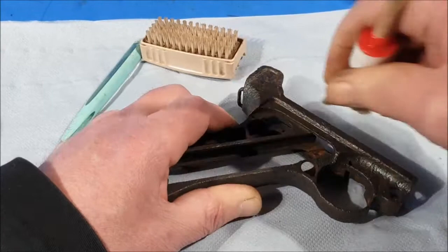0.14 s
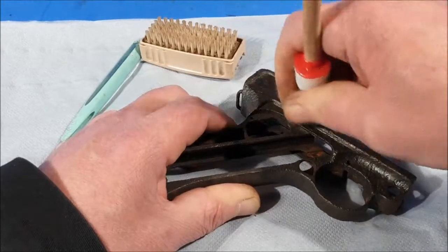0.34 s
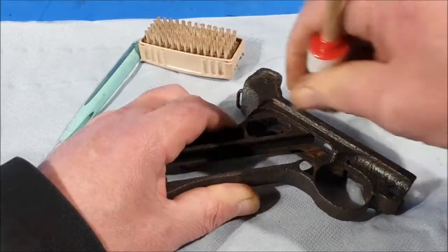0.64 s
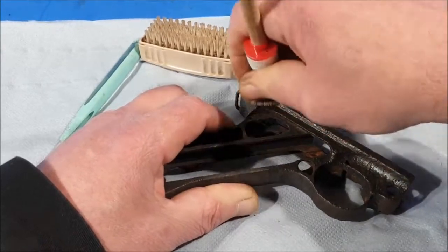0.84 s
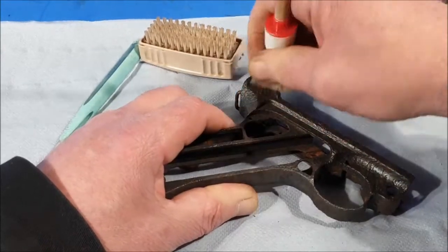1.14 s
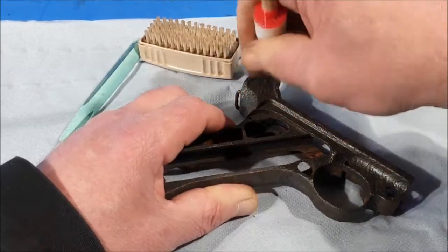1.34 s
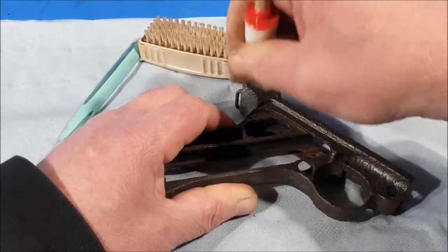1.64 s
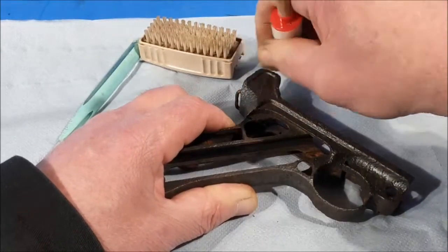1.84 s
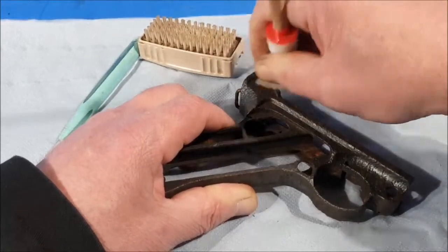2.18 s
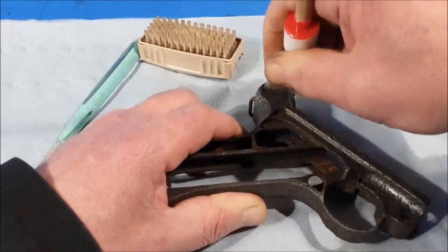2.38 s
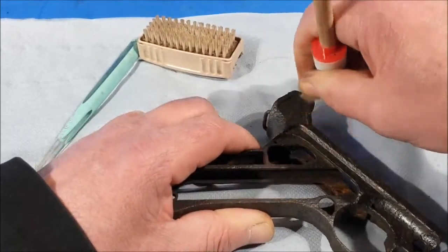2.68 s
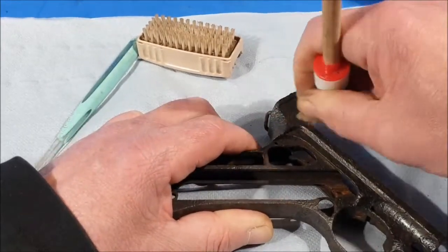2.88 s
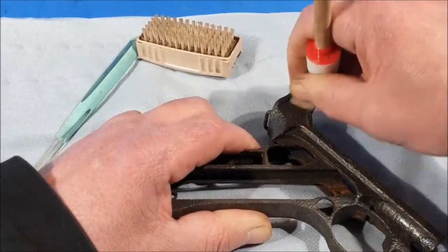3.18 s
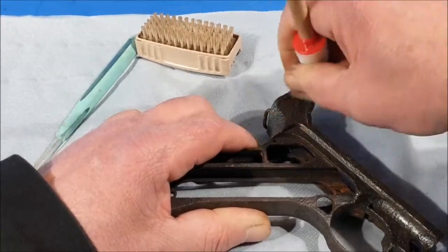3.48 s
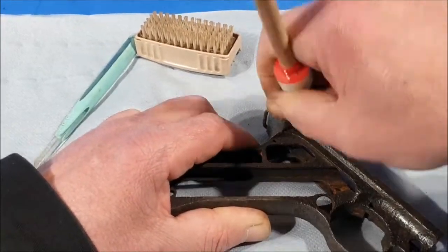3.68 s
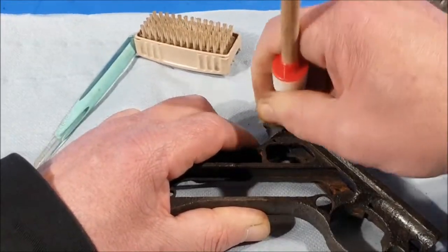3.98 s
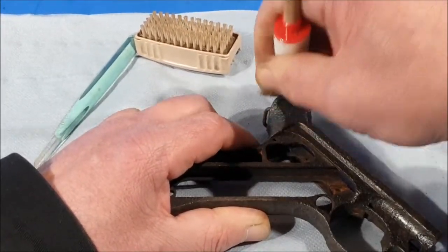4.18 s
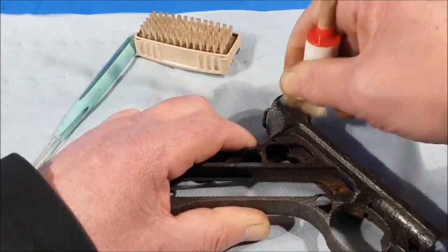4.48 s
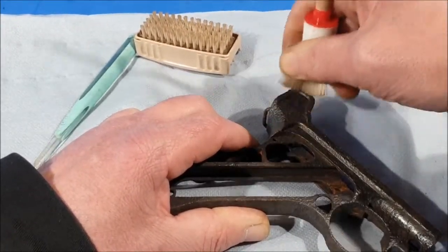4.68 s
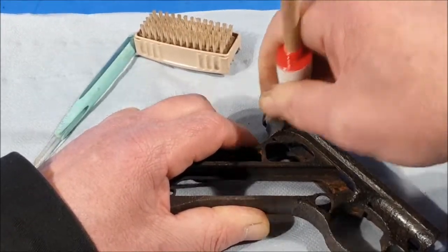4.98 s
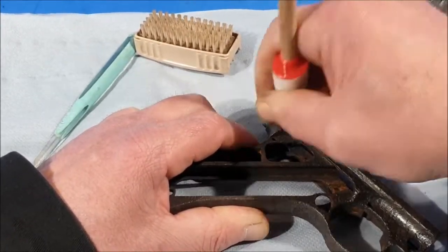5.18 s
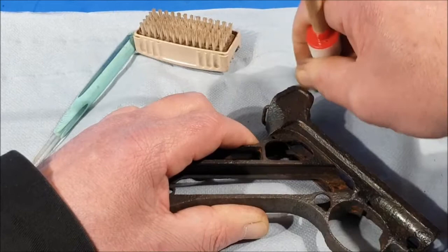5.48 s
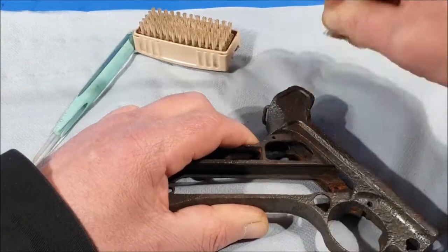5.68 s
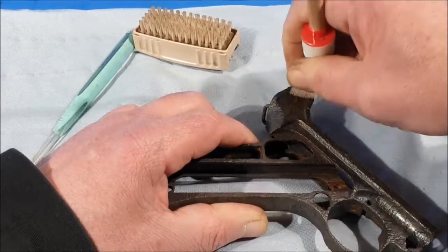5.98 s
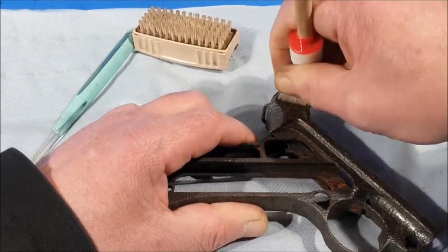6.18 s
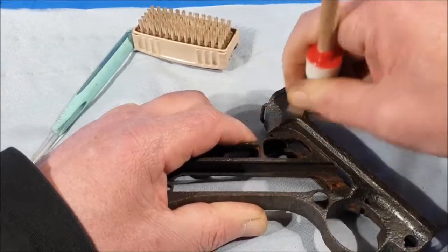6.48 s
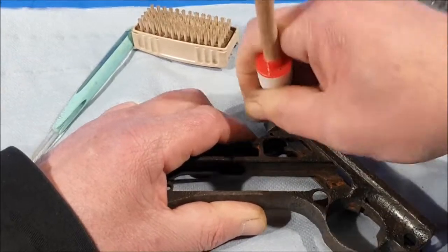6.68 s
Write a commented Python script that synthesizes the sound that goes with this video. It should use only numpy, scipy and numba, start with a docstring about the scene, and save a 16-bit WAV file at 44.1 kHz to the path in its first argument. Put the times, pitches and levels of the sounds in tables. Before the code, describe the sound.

A near, dry stereo pickup in a small quiet room with soft low air noise. From 0 to 0.8 s there are a cut-off scratch, light ticks and a couple of soft brushing sweeps, then a gap with a dull tap. From about 0.9 s bristles rasp over steel in separate strokes, roughly four a second, each a quick swelling bright hiss with gritty undertone, a small tick and a muffled bench thud. Thin metallic rings flicker briefly. Around 2.3 to 2.9 s the strokes soften, with fainter rustling and a barely audible airy tone. Firm regular strokes return from 2.9 to 4.8 s, with rounder thuds. From 4.9 s the scrubbing becomes quicker and denser. Two hard clicks stand out at 5.63 s, followed by a brief lull; rapid scratching resumes at 5.9 s, with a heavier knock and click near 6.7 s, still scrubbing at the end.

```python
"""A cloth-covered workbench in a small quiet room: a stiff hand brush scrubs a rusty steel part.
The bristles hiss and grind as clouds of tiny random slips; soft thuds set the modes of the bench going.
Ticks are short noise bursts; they, the slips and sharp plucks make the steel ring at a few high modes.
A faint airy note comes and goes, and delay lines add a short room tail for the two-port microphone."""
import sys
import numpy as np
from scipy import signal
from scipy.fft import rfft, irfft, next_fast_len
from scipy.io import wavfile
from scipy.ndimage import uniform_filter1d
from numba import njit

SR = 44100
rng = np.random.default_rng(int(sys.argv[2]) if len(sys.argv) > 2 else 0)


def magnitude_from_level(level_db):
    """Linear magnitude for a level in decibels (20 dB per decade)."""
    exponent = np.asarray(level_db, float) / 20
    return 10 ** exponent


def wrap_up_sound(samples):
    """Save the sound to the file named by the first command line argument, as 16-bit audio."""
    columns = np.atleast_2d(samples).T
    # keep every value between -1 and 1, then stretch to whole-number steps
    tamed = np.clip(columns, -1, 1)
    steps = np.round(tamed * 32767).astype(np.int16)
    wavfile.write(sys.argv[1], SR, steps)


N = 301203  # length in samples

# The brush head lands or turns and jolts the bench:
# (time [s], relative strength [dB], contact [ms], lasting modes [dB], their tilt [dB per octave])
BENCH_BLOWS = [(0.0, -48, 1.2, -0.5, -0.5), (0.307, -43.5, 1.9, 0, -1), (0.774, -33, 1.01, -1.5, 1.3),
               (1.15, -31.5, 1.03, -.6, 3), (1.406, -31, 1.2, 0.1, 2), (1.703, -26, 0.97, 1, -0.5),
               (1.937, -35, 1.96, -0.5, 3.5), (2.173, -28.5, 1.1, 0.5, 2.5), (2.492, -45.5, 1.65, 0, -1.5),
               (2.866, -37, 2.14, -2.5, .1), (3.156, -29, 1.7, 1, -0.5), (3.434, -25.5, 1.4, -1, 0.2),
               (3.709, -26, 0.92, 1.3, -2.5), (3.989, -32, 2, -1.3, 0.8), (4.239, -25.5, 1.4, -0.3, -2),
               (4.492, -32.5, 1.5, -2.1, -1.5), (4.749, -28, 1.3, -5, 0.5), (4.925, -45, 1.93, 1.8, 0.5),
               (5.131, -36.5, 1.17, 1, -1.5), (5.328, -43.5, 1.5, 2.5, -1.7), (5.403, -45, 1.4, -9, 6),
               (5.513, -36.5, 2.3, 2.5, -2.8), (5.635, -35.5, 1.44, -1.3, 0), (5.89, -32, 1.4, 0.8, -1.1),
               (6.007, -38.5, 0.58, 3, -0.7), (6.089, -45, 2.1, 0, 2.5), (6.302, -47, 1, -1, 1),
               (6.384, -37, 2.1, 0.5, -1), (6.685, -23.5, 2.06, -2.5, 0.3)]
# Modes of the steel part: (frequency [Hz], time to fall by 60 dB [s], left gain [dB], right gain [dB])
STEEL_MODES = [(4815, 0.08, -6, -13.5), (5960, 0.064, -34, -20), (7642, 0.0457, 2, -27),
               (8430, 0.054, -10, -21), (9830, 0.058, -27, -23), (10600, 0.039, -20, -26),
               (11240, .04, -44, -30), (13900, .06, -35, -33), (13700, .05, -17, -22)]
LOW_RING_HZ = 6500  # steel modes below this count as low, the others as high


def level(x, db):
    """Scale to an rms level."""
    return x * magnitude_from_level(db) / np.sqrt(np.mean(x ** 2))


def colour(x, table, column):
    """Shape the spectrum by one dB column of a table, joined on a log-frequency axis."""
    table = np.array(table, float)
    size = next_fast_len(N)
    hz = np.maximum(np.arange(size // 2 + 1) * SR / size, 1)
    # frequencies outside the table are turned down by 70 dB
    db = np.interp(np.log(hz), np.log(table[:, 0]), table[:, column], -70, -70)
    return irfft(rfft(x, size) * magnitude_from_level(db), size)[..., :N]


def ring(x, hz, t60):
    """One decaying mode, t60 in s; steady white noise of rms 1 makes it ring near rms 1."""
    pole = np.exp(2j * np.pi * hz / SR - np.log(1000) / (t60 * SR))
    gain = np.sqrt(2 * (1 - abs(pole) ** 2))
    return signal.lfilter([gain], [1, -pole], x).imag


def walk(rate):
    """Slow random wander: a new random value every 1 / rate s, joined by ramps."""
    k = int(SR / rate)
    held = np.repeat(rng.standard_normal(N // k + 1), k)
    return uniform_filter1d(held, k)[:N]


def slips(per_s, spread_db):
    """Bristles catching and letting go: scattered clicks of uneven size, rms 1."""
    size = magnitude_from_level(spread_db * rng.exponential(size=N)) * rng.standard_normal(N)
    return level(size * (rng.random(N) < per_s / SR), 0)


def quiet():
    """Still air of the room: alike at both ports in the bass, unrelated above."""
    # spectrum of the air noise: (frequency [Hz], relative level [dB])
    air_tone = [(18, -21), (40, 10.5), (60, 9), (95, 3), (140, -1.5), (300, -10), (650, -13), (870, -10.5),
                (1130, -23.5), (1500, -27), (1900, -28), (2250, -27.5), (2800, -29.5), (7000, -34.5),
                (9000, -41), (16500, -24)]
    # balance of the ports: (frequency [Hz], left minus right [dB])
    air_pan = [(60, 0.5), (500, 10), (1500, 10.5), (7000, 19), (10000, 21), (15000, 13)]
    mid, left, right = rng.standard_normal((3, N))
    bass_filter = signal.butter(2, 350., fs=SR, output="sos")
    # in the bass this swaps each port's own noise for the shared one
    bass = signal.sosfilt(bass_filter, [mid - left, mid - right])
    air = level(colour(np.array([left, right]) + bass, air_tone, 1), -61)
    half = [(hz, db / 2, -db / 2) for hz, db in [(0.94, 0)] + air_pan + [(SR / 2, 0)]]
    drift = magnitude_from_level(1.6 * walk(3))
    return np.array([colour(air[k], half, 1 + k) for k in range(2)]) * drift


@njit
def walls(x, lags, gain, damp):
    """Room tail: eight delay lines (lags in samples) that feed each other, duller on every round."""
    line, soft, out = np.zeros((8, 4096)), np.zeros(8), np.zeros((2, x.shape[1]))
    for i in range(x.shape[1]):
        total = 0.
        for k in range(8):
            soft[k] += (1 - damp) * (gain[k] * line[k, (i - lags[k]) & 4095] - soft[k])
            total += soft[k]
            out[k % 2, i] += soft[k]
        for k in range(8):
            line[k, i & 4095] = x[k % 2, i] + soft[k] - total / 4
    return out


def airy():
    """A faint airy note: noise that wavers in level and rings one narrow mode."""
    # when the note sounds: (start [s], length [s], relative level [dB])
    note_spans = [(0.197, .25, -77), (2.449, 1.38, -77.5), (5.642, .4, -69)]
    edge_s = 0.071  # fade at both ends
    port_db = np.array([5, -31])  # left, right
    t = np.arange(N) / SR
    gain = np.zeros(N)
    for s, length, db in note_spans:
        gain += magnitude_from_level(db) * np.clip(np.minimum(t - s, s + length - t) / edge_s, 0, 1)
    waver = magnitude_from_level(1.5 * walk(48))
    note = ring(gain * waver * rng.standard_normal(N), hz=2269, t60=0.04)
    return magnitude_from_level(port_db)[:, None] * note


def bench(push):
    """A soft blow slaps the bench top; the slap drives its longer modes; dragging keeps them rumbling."""
    # modes of the bench top: (frequency [Hz], time to fall by 60 dB [s], gain [dB])
    bench_modes = [(50.29, 0.94, -9), (80.9, 0.17, -10.5), (93, 0.13, -12.5), (108, 0.347, -21),
                   (131.3, 0.24, -19), (141.56, 0.47, -13), (168.4, 0.34, -10), (217.2, 0.55, -3),
                   (255.36, 0.48, -8), (287.6, 0.17, 1.5), (372, 0.68, -0.5), (382, 0.44, -1)]
    slap_hz, slap_t60, slap_db = 124.9, 0.019, -31.5  # t60 in s, of each of its two stages
    rebound_db, rebound_s = -12, (.03, .09)  # level against the blow; earliest and latest delay
    pan_db = 2  # left over right

    drag = magnitude_from_level(-50.5) * uniform_filter1d(push * rng.standard_normal((2, N)), size=40)
    force = np.tile(drag[0], (1 + len(bench_modes), 1))  # row 0 is for the slap itself
    chance = rng.standard_normal((len(BENCH_BLOWS), len(bench_modes)))
    moments = rng.random(len(BENCH_BLOWS))
    t = np.arange(600) / SR
    octaves = np.log2(np.array(bench_modes)[:, 0] / slap_hz)
    for (s, db, ms, linger_db, tilt_db), luck, when in zip(BENCH_BLOWS, chance, moments):
        i = int(s * SR)
        contact = np.diff(np.exp(-((t - .0042) / (ms / 1000)) ** 2))
        # each blow falls on another spot, so the modes share it differently
        mode_db = linger_db + tilt_db * octaves + 2.9 * luck
        share = magnitude_from_level(db - 10.5 + np.append(0, mode_db))
        force[:, i:i + len(contact)] += share[:, None] * contact
        # the part rocks back once
        i += int(np.interp(when, (0, 1), rebound_s) * SR)
        force[:, i:i + len(contact)] -= magnitude_from_level(rebound_db) * share[:, None] * contact
    # the blow passes through cloth and top in turn, so the slap swells before it dies
    slap = ring(ring(force, slap_hz, slap_t60), slap_hz, slap_t60)
    modes = [magnitude_from_level(db) * ring(x, hz, t60) for x, (hz, t60, db) in zip(slap[1:], bench_modes)]
    mono = magnitude_from_level(slap_db) * slap[0] + sum(modes)
    # the lowest sway and the highest modes reach the ports unevenly
    side = 0.48 * modes[0] + 0.18 * sum(modes[-4:])
    side = side + magnitude_from_level(19.5) * ring(drag[1], hz=73.0, t60=0.09)
    return np.array([magnitude_from_level(pan_db / 2) * mono + side, magnitude_from_level(-pan_db / 2) * mono - side])


def flicks(column):
    """The tuft springs off an edge and plucks the steel: one single-sample blow a row."""
    # plucks: (time [s], relative level of low modes [dB], relative level of high modes [dB])
    plucks = [(1.19, -48, -52), (1.24, -46, -56), (1.286, -47, -65.5), (1.515, -52, -52), (1.785, -54, -46),
              (2.04, -52, -48), (2.265, -56, -50), (2.735, -46, -62), (2.968, -36, -60), (3.268, -39, -48),
              (3.552, -39, -54), (3.78, -40, -58), (3.822, -43, -62), (3.875, -45, -58), (4.53, -43, -57),
              (5.51, -47, -60), (5.576, -47, -60), (6.01, -44, -56), (6.385, -41, -53.5), (6.455, -38, -46),
              (6.565, -46, -68)]
    pluck = np.zeros(N)
    for row in plucks:
        pluck[int(row[0] * SR)] = magnitude_from_level(row[column] + 22)  # so short a blow needs this boost
    return pluck


def ticks():
    """Bristle tips or the metal collar hit steel: noise bursts, a duller knock, and blows to the modes."""
    # ticks: (time [s], relative strength [dB], ring over the tick [dB], dull knock over the tick [dB])
    tick_hits = [(0.2975, -35.5, -15, -17), (0.3224, -39, -19, -10), (0.3516, -47, -12.5, -16.5),
                 (0.707, -48, -22, -24), (0.7295, -50, -8, -9), (0.7715, -39, -21, -11),
                 (0.7769, -34, -20, -3.5), (1.1514, -29.5, -8, -21), (1.4088, -30, -10, -25),
                 (1.6087, -43, -6, -12), (1.7047, -32, -24, -6), (1.94, -41, -1, -14),
                 (2.1757, -27.5, -26, -19.5), (2.4725, -38, -15.5, 5.5), (2.8664, -32, -13, -10),
                 (2.9028, -33, -18, 0), (3.1584, -29.5, -12, -4), (3.4343, -22, -32, -12.5),
                 (3.4955, -38.5, -12.5, -3), (3.714, -26, -16, -9.5), (3.8638, -51, -7, -5),
                 (3.9908, -37.5, -9, -4), (4.2424, -29, -8.5, -6), (4.4802, -47, -23, -15),
                 (4.4942, -29.5, -5.5, -8.5), (4.7544, -28, 2.5, 6), (4.931, -38.5, 4.5, -15),
                 (5.5838, -32.5, -10, 3), (5.596, -33.5, -20, 14.5), (5.6266, -14.5, -11, -3.5),
                 (5.6397, -16, -10, 3.2), (5.893, -25.5, -17, -8), (5.952, -36, -20.5, -5.5),
                 (6.3053, -31, -17, -7), (6.687, -38, -8, 4), (6.705, -20, -43, -9.5),
                 (6.7264, -38, -23, 2), (6.7965, -41, -12, -13.5)]
    decay_s = .0025
    burst, knock, blow = np.zeros(N), np.zeros(N), np.zeros((len(STEEL_MODES), N))
    chance = rng.standard_normal((len(tick_hits), len(STEEL_MODES)))
    t = np.arange(1500) / SR
    for (s, db, ring_db, knock_db), luck in zip(tick_hits, chance):
        i = int(s * SR)
        shape = magnitude_from_level(db) * np.exp(-t / decay_s)[:N - i]
        burst[i:i + len(t)] += shape
        knock[i:i + len(t)] += magnitude_from_level(knock_db) * shape
        blow[:, i] += magnitude_from_level(db + ring_db + 16.0 + 1.7 * luck)
    return burst * rng.standard_normal((2, N)), knock * rng.standard_normal(N), blow


def steel(low, high, blow):
    """Slips, plucks and ticks ring the same modes of the part."""
    out = 0
    for (hz, t60, *port_db), hit in zip(STEEL_MODES, blow):
        is_low = hz < LOW_RING_HZ
        rub = (low if is_low else high) * slips(900, spread_db=1.5)
        pluck = flicks(column=1 if is_low else 2)
        mode = ring(magnitude_from_level(0.5) * rub + hit + pluck, hz, t60)
        out = out + magnitude_from_level(np.array(port_db))[:, None] * mode
    return out


def controls():
    """Strength of each sweep and what follows from it: brightness, grind, steel ring and bench push."""
    # sweeps of the bristles:
    # (full speed at [s], speeding up [s], hold [s], fade [s], relative hiss level [dB])
    sweeps = [(0.0, 0.0082, 0.00173, 0.032, -43), (0.146, 0.22, .02, .17, -56),
              (0.305, .004, .002, 0.063, -56.5), (0.381, 0.047, 0.023, 0.044, -47.5),
              (0.465, 0.118, 0.028, 0.071, -37.5), (0.561, 0.043, .015, 0.016, -50),
              (0.62, .04, 0.028, 0.045, -86.5), (0.944, 0.118, 0.019, 0.0083, -37),
              (1.193, 0.033, .002, .04, -42.5), (1.261, 0.069, 0.025, .015, -38),
              (1.503, 0.069, 0.00356, 0.016, -29.5), (1.61, .006, .002, 0.01, -43.5),
              (1.763, .055, 0.018, 0.016, -31.5), (1.836, 0.034, .03, 0.08, -69),
              (1.965, .024, .01, .03, -50), (2.008, .05, .022, .022, -31.5),
              (2.223, 0.042, 0.0193, 0.046, -33), (2.306, 0.015, .002, 0.266, -56.5),
              (2.423, .1, .03, .1, -64.5), (2.482, 0.069, .11, 0.13, -53.5),
              (2.632, 0.024, 0.049, 0.046, -44), (2.699, 0.07, 0.0223, 0.027, -39.5),
              (2.765, .02, 0.0204, 0.156, -63.5), (2.924, 0.026, 0.044, 0.028, -37),
              (3.228, 0.075, 0.03, 0.013, -34.5), (3.295, 0.024, 0.146, .02, -66),
              (3.479, 0.035, 0.067, 0.026, -36.5), (3.788, 0.079, 0.018, 0.0155, -33.5),
              (3.87, .04, 0.0021, 0.025, -63), (4.097, 0.0936, 0.0198, 0.013, -42),
              (4.31, .06, .02, .05, -45), (4.36, .06, .02, 0.024, -39), (4.533, 0.049, 0.078, 0.06, -39.5),
              (4.756, .003, .004, .02, -39), (4.783, 0.028, 0.0016, .11, -35),
              (4.933, 0.0036, 0.0174, 0.0233, -44.5), (5.01, 0.046, 0.049, 0.0423, -42.5),
              (5.135, 0.031, 0.033, 0.0235, -35), (5.222, 0.033, 0.0117, 0.048, -35.5),
              (5.337, 0.047, 0.0018, 0.015, -36), (5.404, 0.034, 0.034, 0.031, -39.5),
              (5.539, 0.069, .002, 0.057, -35.5), (5.599, 0.021, 0.00194, 0.022, -36.5),
              (5.637, 0.017, .011, 0.057, -41.5), (5.747, .05, 0.19, 0.022, -60),
              (5.907, .011, .002, 0.1, -46.5), (6.014, 0.042, 0.00166, 0.034, -39),
              (6.084, .028, 0.029, 0.059, -37), (6.198, 0.046, 0.03, 0.0444, -38.5),
              (6.317, 0.056, .002, 0.044, -39), (6.383, .012, .015, .03, -40),
              (6.415, .04, .01, 0.012, -34.5), (6.456, 0.014, 0.033, 0.026, -35.5),
              (6.564, 0.12, .004, 0.029, -45.5), (6.736, 0.029, 0.015, 0.0176, -70),
              (6.805, 0.0297, .04, .02, -40.5)]
    # the brush wanders over the part:
    # (time [s], how freely steel rings [dB], how strong the low grind or cloth rustle is against the hiss [dB])
    spots = [(0.2, -6, -2.1), (0.5, -9, -1.8), (.62, -7.5, -0.5), (0.9, -10, -1.3), (1.25, 5, -3.2),
             (1.5, -2.5, 2), (1.77, 6, 0.5), (1.88, -3, 7), (2.0, .1, 2), (2.25, 4, 1.5), (2.43, -1, 9.5),
             (2.7, -8, -3), (2.95, -4, -0.1), (3.24, -1, 0.6), (3.5, 1, -0.2), (3.8, 4, 2), (4.1, -9, -5),
             (4.35, -9, -1.8), (4.55, -4.5, -2.7), (4.8, 2, 0.5), (5.03, -8, 1.3), (5.3, 2, .1),
             (5.55, 1, 1), (5.75, -6, 3), (6.0, 2, 0), (6.3, -3, -0.7), (6.5, 3, 1.5), (6.8, 2, -1.5)]
    # the hand's hold: (time [s], upright tuft, so brighter [dB], weight on the bench [dB])
    grips = [(0.1, .1, -2.5), (0.45, .6, -2.5), (0.9, -.6, .1), (1.25, -1.1, 3), (1.5, -.6, 2.5),
             (1.77, -1.1, .1), (2.0, -1.5, 4), (2.24, -1.5, 3), (2.5, .1, 3), (2.7, 1.5, -2.5),
             (2.95, .6, .1), (3.24, .1, .1), (3.5, .6, -.1), (3.8, -.1, 2.5), (4.1, .6, -3), (4.35, .6, .1),
             (4.58, .6, .1), (4.8, -.6, 2.5), (5.03, 1.1, 3), (5.3, -.6, 2.5), (5.55, .6, 3),
             (6.0, -.6, -3), (6.2, -1.1, .1), (6.45, .1, .1), (6.8, .1, -.1)]
    swell_db = 20  # a sweep grows by this while it speeds up and loses as much in its fade time
    rise_curve, fade_curve, climb_db_per_s = 1.28, 0.96, 17  # flank roundness; growth in the hold
    scuff_db, scuff_fade_s = -17, 0.094  # the tips scuff as the head lands: level over the thud
    # light sweeps are mostly grind: it follows the hiss by this power, around this level
    grind_power, pivot_db = 0.689, -40

    t = np.arange(N) / SR
    power, staged = np.full(N, 1e-18), np.zeros(N)
    scuffs = [(s + .003, .002, 0, scuff_fade_s, db + scuff_db) for s, db, *_ in BENCH_BLOWS]
    for s, rise, hold, fade, db in sweeps + scuffs:
        span = slice(max(int((s - rise) * SR), 0), int((s + hold + 4 * fade) * SR))
        early = np.maximum(s - t[span], 0) / rise
        late = np.maximum(t[span] - s - hold, 0) / fade
        climb_db = climb_db_per_s * (np.clip(t[span] - s, 0, hold) - hold / 2)
        flank_db = swell_db * (early ** rise_curve + late ** fade_curve)
        sweep = magnitude_from_level(db + climb_db - flank_db) ** 2
        power[span] += sweep
        staged[span] += sweep * (np.minimum(late, 1) - early)
    drag = uniform_filter1d(np.sqrt(power), size=40)
    stage = staged / power  # from -1 (start) over 0 (full speed) to 1 (faded)

    s, *spot = np.transpose(spots)
    ring_db, grind_db = (np.interp(t, s, db) for db in spot)
    s, *grip = np.transpose(grips)
    lean_db, weight_db = (np.interp(t, s, db) for db in grip)

    def follow(db, early_db, late_db):
        """Level in dB: at full speed, plus more at the start of a sweep, plus more in its fade."""
        return db + early_db * np.maximum(-stage, 0) + late_db * np.maximum(stage, 0)

    bright_db = follow(-3, .1, 1.1) + lean_db
    grind_gain = magnitude_from_level(pivot_db + follow(-17.5, -6.1, 2.1) + grind_db)
    grind = grind_gain * np.abs(drag / magnitude_from_level(pivot_db)) ** grind_power
    free = drag * magnitude_from_level(ring_db)
    low = free * magnitude_from_level(follow(-12.5, -2.1, 1.5))
    high = free * magnitude_from_level(follow(-20.5, 1.5, 1.5))
    push = drag * magnitude_from_level(follow(3, 10, -1) + weight_db)
    return drag, bright_db, grind, low, high, push


def bristles(drag, bright_db, grind, burst, knock):
    """Many tips slip at once; the ports hear mostly different tips, and the whole tuft stutters together."""
    # bristle hiss at each port: (frequency [Hz], left gain [dB], right gain [dB])
    hiss_tone = [(2540, -29, -15.5), (3116, -8.5, -33), (3930, -4, -19.5), (4190, -1.5, -10.5),
                 (4800, -1, -6), (4840, -2, -11), (6200, 0.5, -12.5), (7520, -0.5, -19.5), (7940, -5, -17),
                 (9280, -1.5, -6), (9550, -3, -1), (10600, -0.5, -4), (12960, -2.5, -10), (15060, 1, -11.5),
                 (17000, 3, -4.5)]
    # low grind or cloth rustle at each port: (frequency [Hz], left gain [dB], right gain [dB])
    grind_tone = [(247, 1, -1), (560, -7, -8.5), (914, -3, -15), (1247, -2.5, -25), (1390, -10, -17),
                  (2570, 0, -22), (2600, -4, -26), (3534, -8.5, -38)]
    hollow_db = (-10, -23.5)  # air in the hollow frame: left, right

    stutter = magnitude_from_level(1.4 * walk(70) + 1.2 * walk(350))
    shared = slips(14000, spread_db=1.5)
    tips = np.array([0.339 * shared + slips(14000, spread_db=2.0) for _ in range(2)])
    grit = np.array([0.91 * shared + slips(5000, spread_db=0.0) for _ in range(2)])
    grit = grind * stutter * grit
    # the lean of the tuft shifts the hiss between its duller and brighter halves
    dull = signal.sosfiltfilt(signal.butter(3, 8500., fs=SR, output="sos"), tips)
    dull_gain = magnitude_from_level(-1.2 * (bright_db + 3) + 1.14 * walk(30))
    bright_gain = magnitude_from_level(bright_db + 2.0 + 2.35 * walk(30))
    tips = dull_gain * dull + bright_gain * (tips - dull)
    out = []
    for k in range(2):
        hiss = colour(magnitude_from_level(6) * drag * stutter * tips[k] + magnitude_from_level(-2) * burst[k], hiss_tone, 1 + k)
        hollow = magnitude_from_level(hollow_db[k]) * ring(grit[k], hz=2294, t60=0.04)
        rough = colour(magnitude_from_level(14.5) * grit[k] + knock, grind_tone, 1 + k)
        out.append(hiss + hollow + rough)
    return np.array(out)


def scene():
    """Brush, steel and bench, the room's answer and its quiet."""
    drag, bright_db, grind, low, high, push = controls()
    burst, knock, blow = ticks()
    near = bristles(drag, bright_db, grind, burst, knock) + steel(low, high, blow)
    lags = np.array([421, 557, 683, 811, 967, 1123, 1291, 1453])  # samples
    room_t60_s, room_db = .33, -25.5
    gain = magnitude_from_level(-60 * lags / SR / room_t60_s)
    room = walls(near + 1e-18, lags, gain, .03)  # the last number is the damping
    return near + magnitude_from_level(room_db) * room + bench(push) + airy() + quiet()


def roll_off(x):
    """The treble ends steeply here."""
    return signal.sosfilt(signal.butter(12, 17010, fs=SR, output="sos"), x)


def record(dry):
    """The microphone loses the deepest bass and the recorder cuts the very top."""
    bass_cut = signal.butter(2, 38., "high", fs=SR, output="sos")
    top_cut = signal.ellip(10, .2, 45, 15650, fs=SR, output="sos")
    mix = signal.sosfilt(top_cut, signal.sosfilt(bass_cut, dry))
    return roll_off(mix)


dry = scene()
out = record(dry)
wrap_up_sound(out)
```